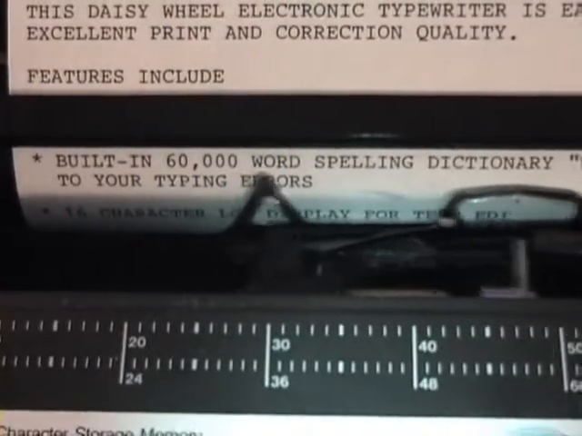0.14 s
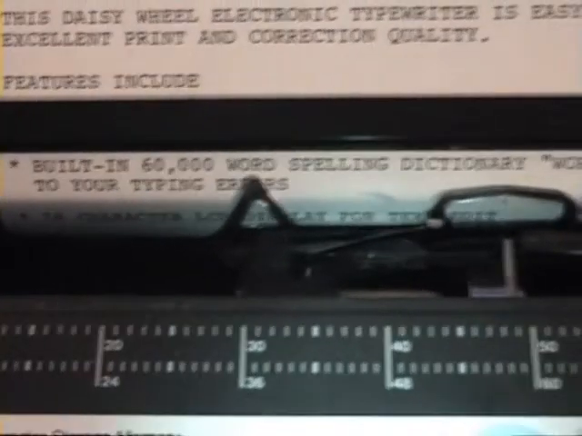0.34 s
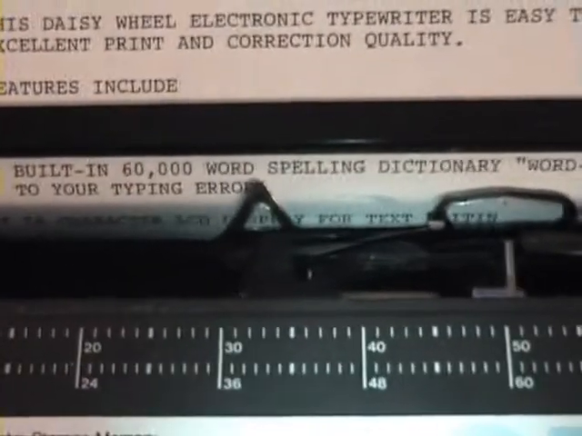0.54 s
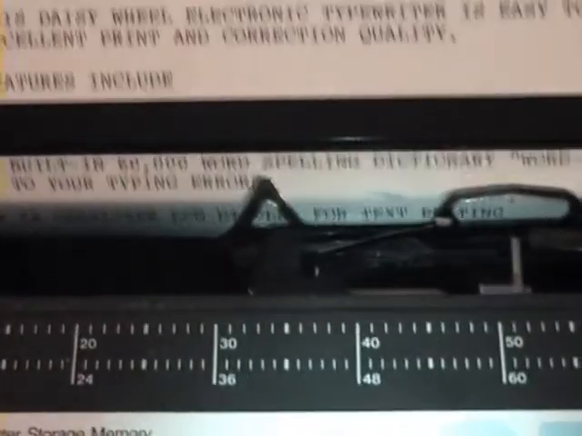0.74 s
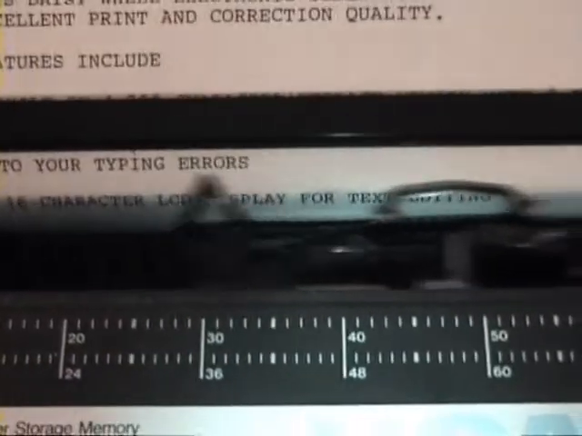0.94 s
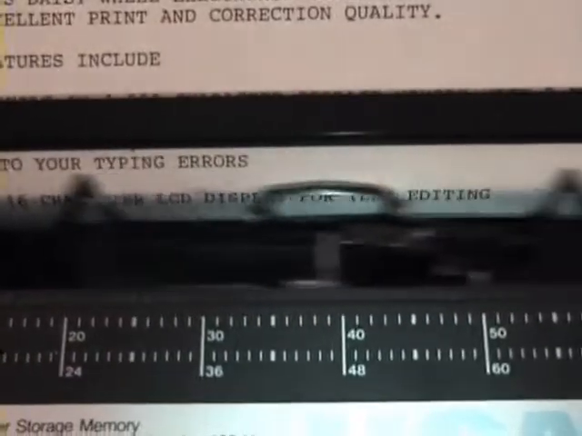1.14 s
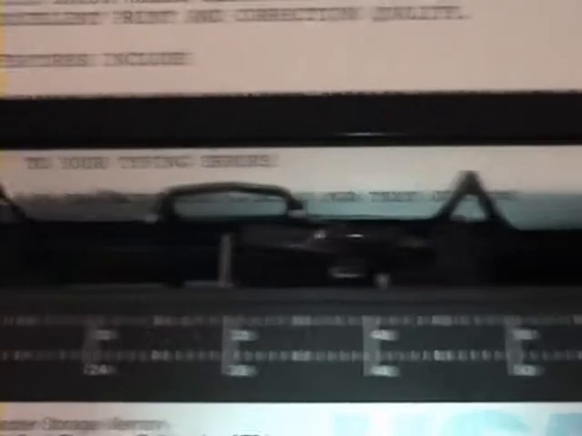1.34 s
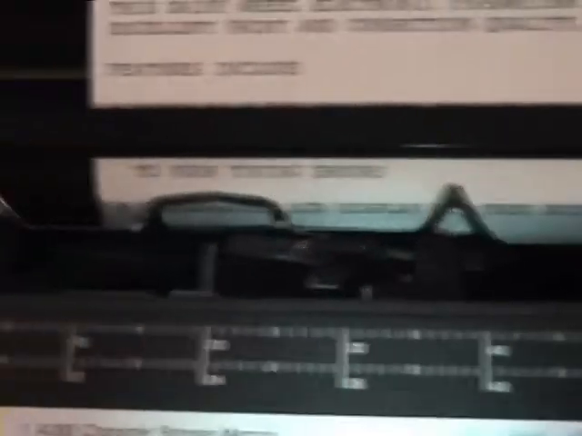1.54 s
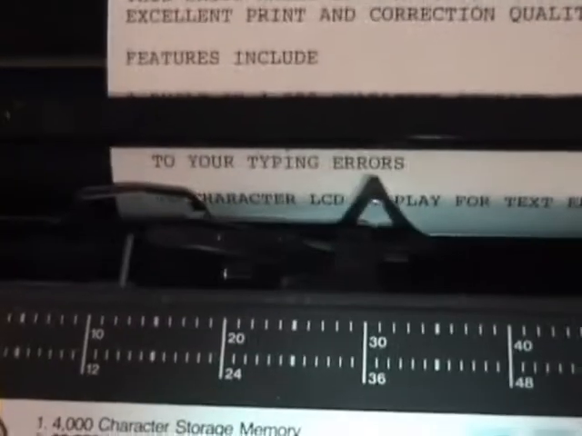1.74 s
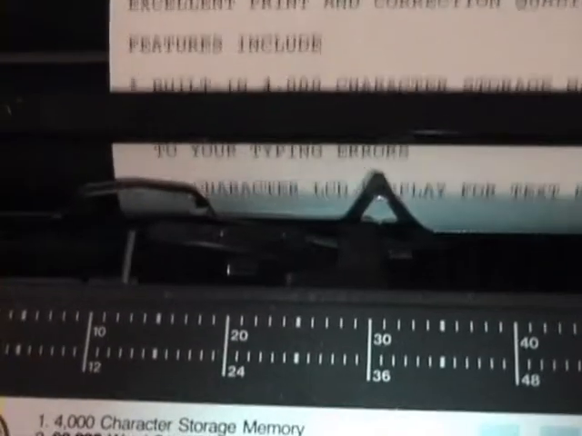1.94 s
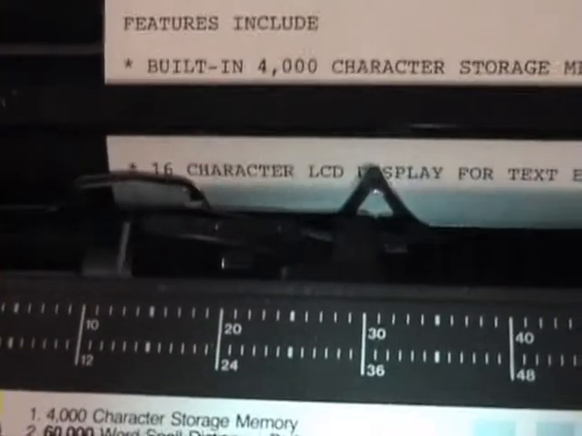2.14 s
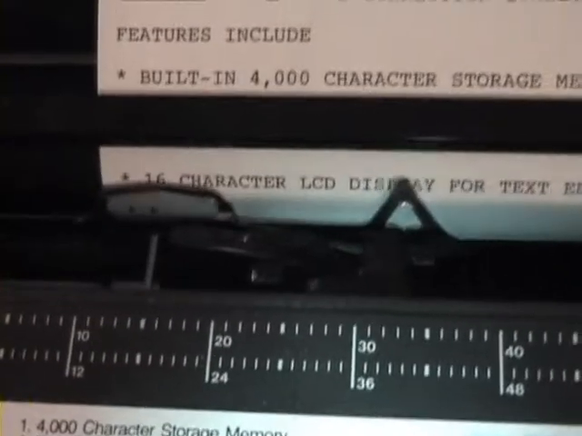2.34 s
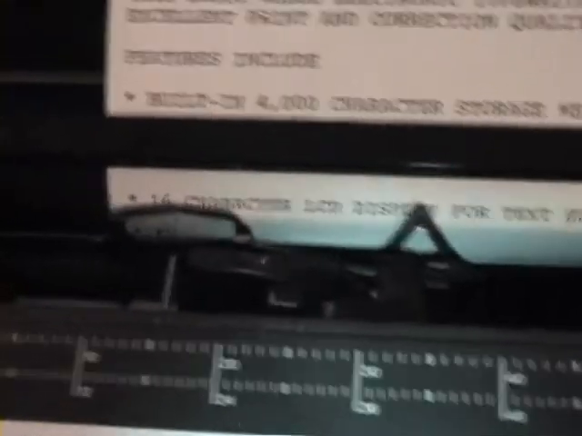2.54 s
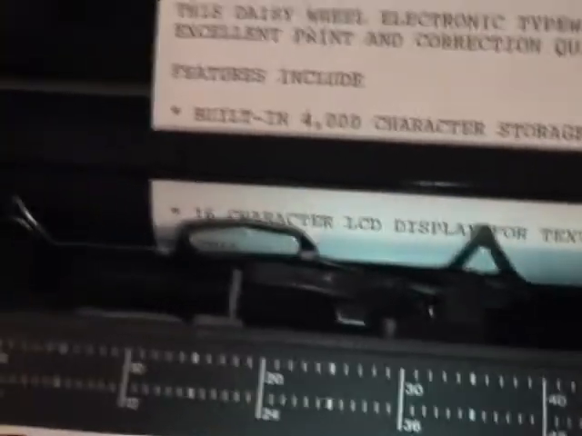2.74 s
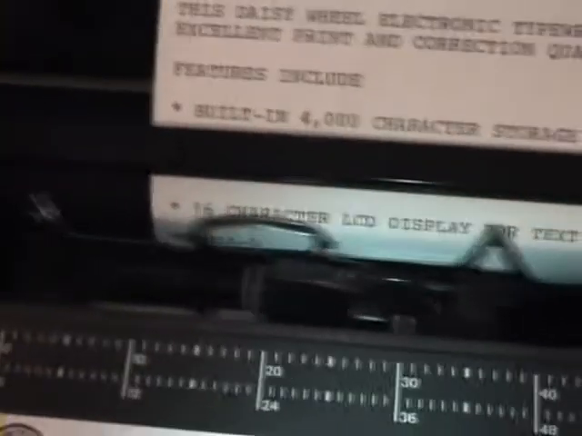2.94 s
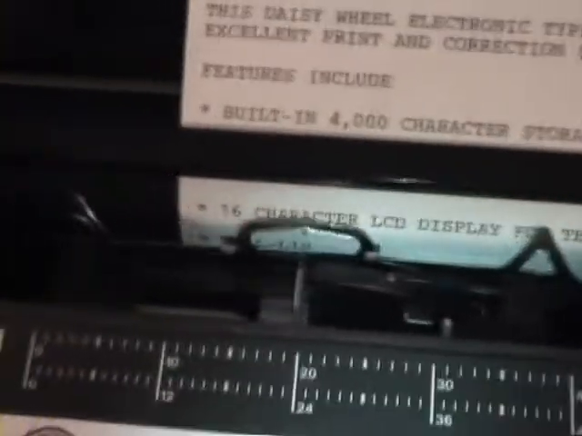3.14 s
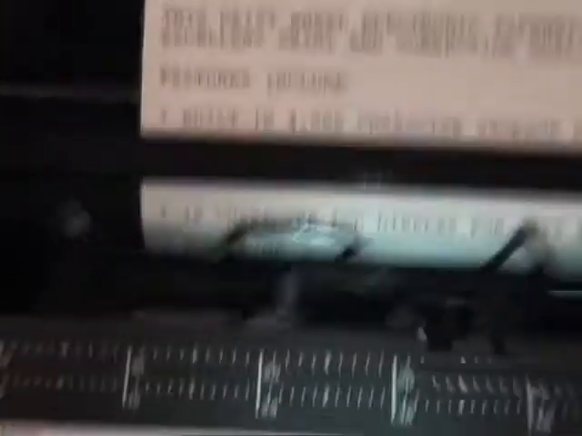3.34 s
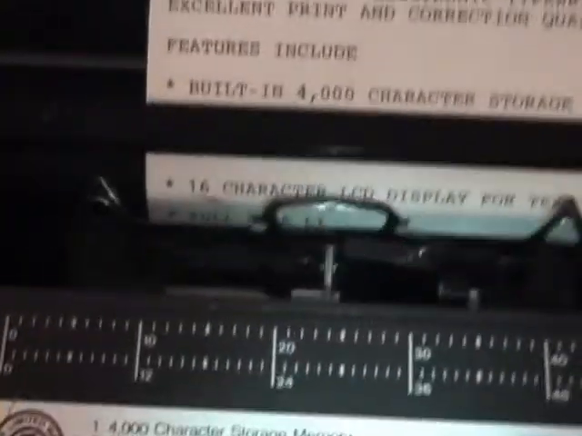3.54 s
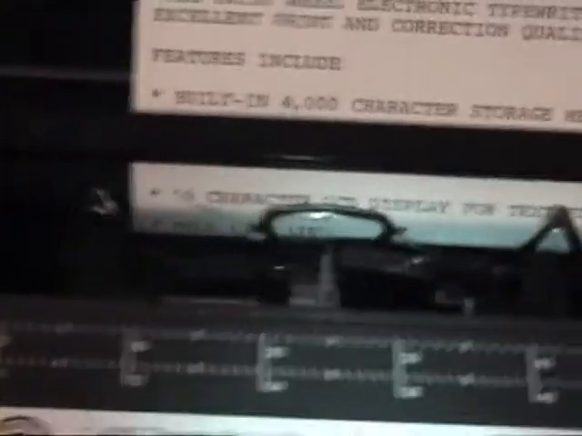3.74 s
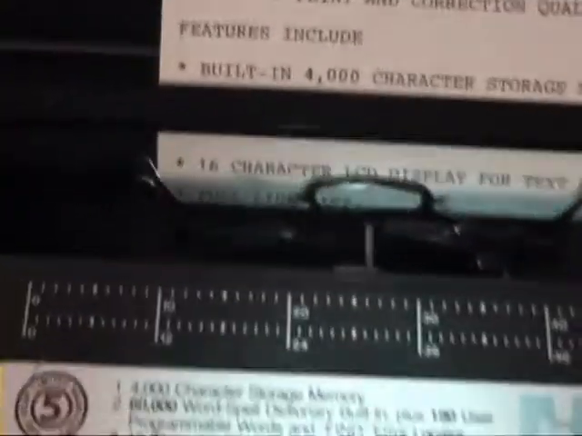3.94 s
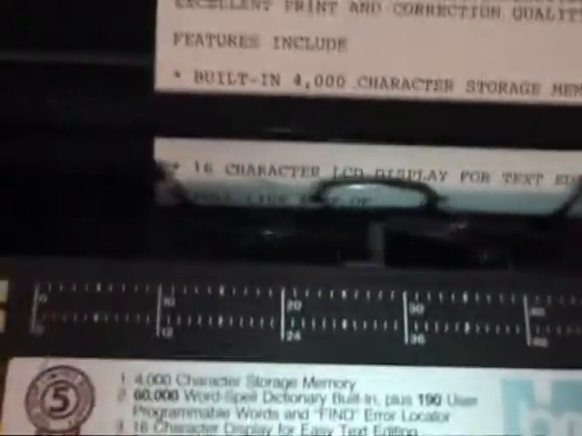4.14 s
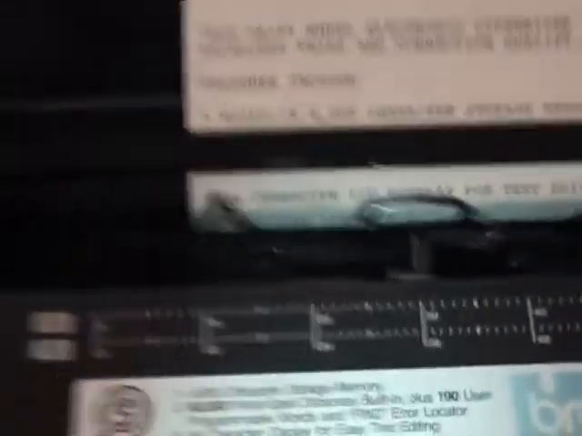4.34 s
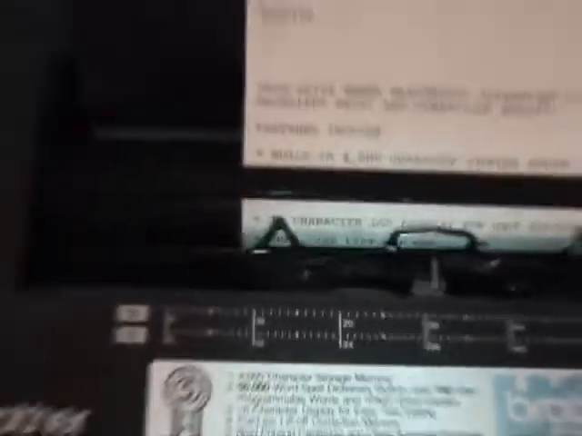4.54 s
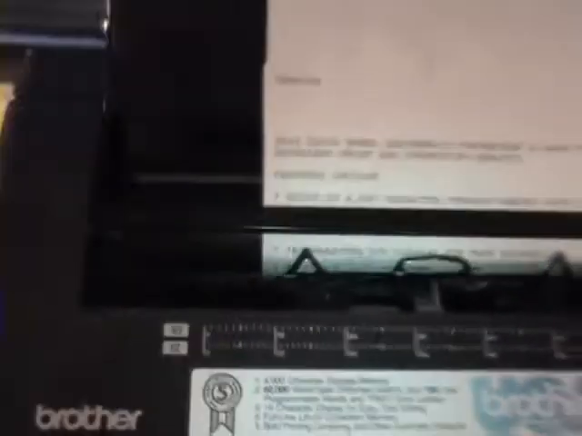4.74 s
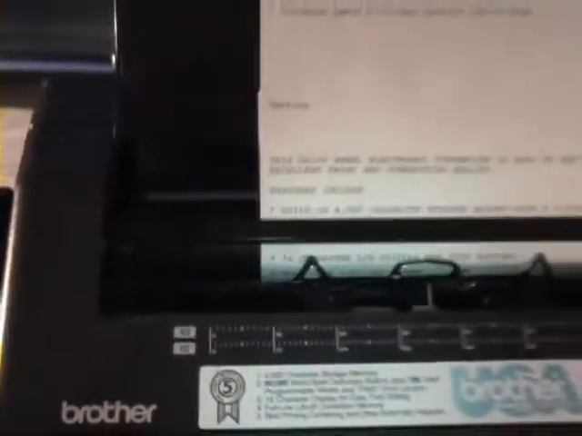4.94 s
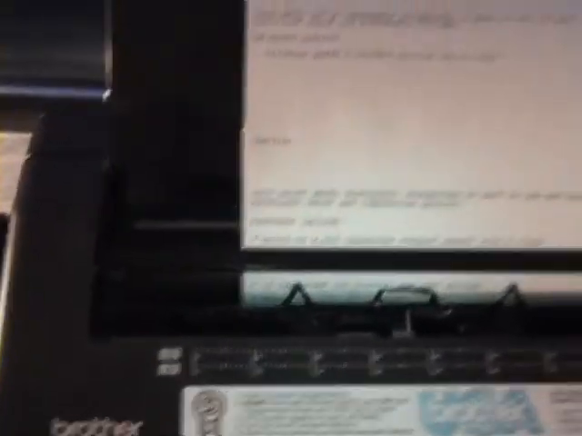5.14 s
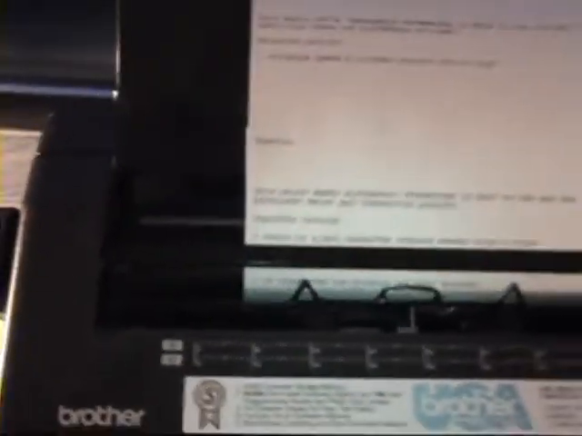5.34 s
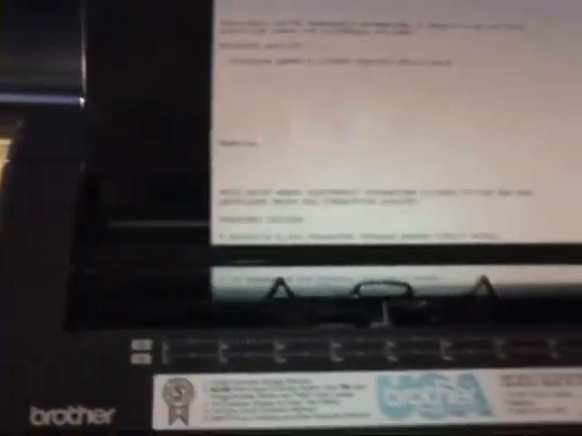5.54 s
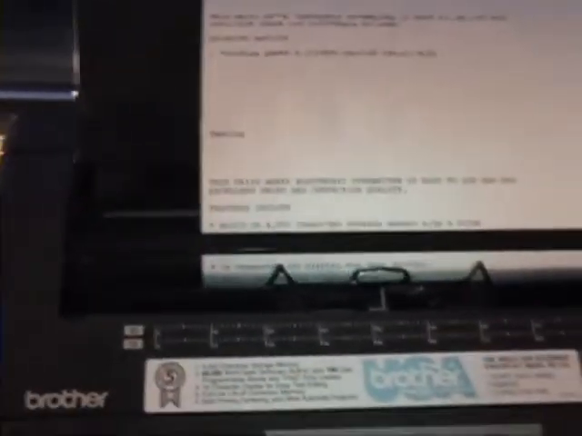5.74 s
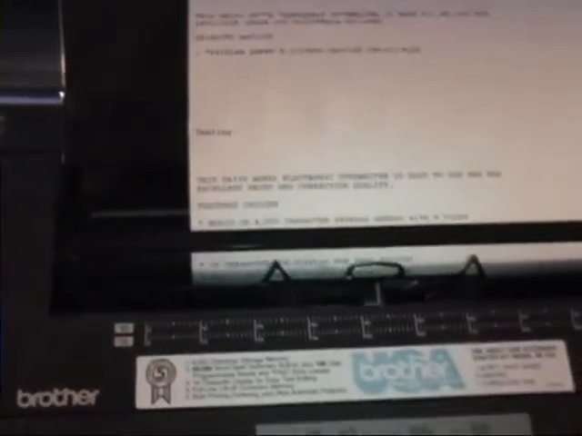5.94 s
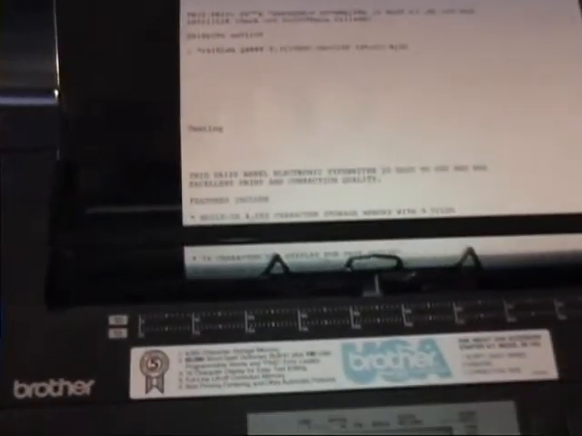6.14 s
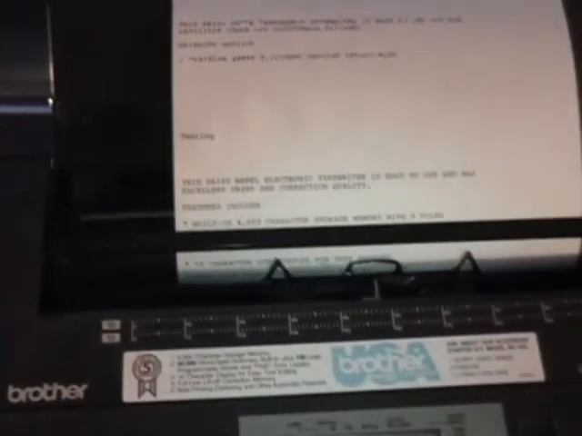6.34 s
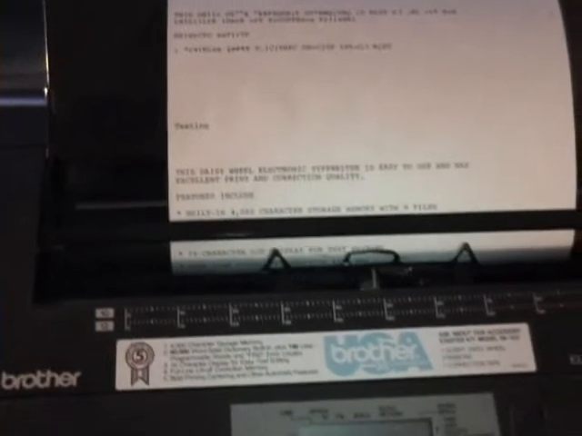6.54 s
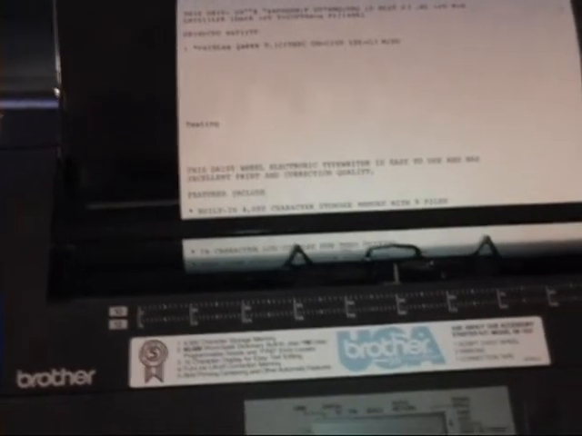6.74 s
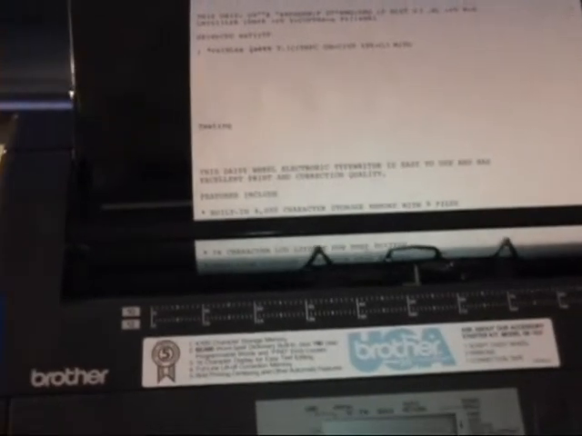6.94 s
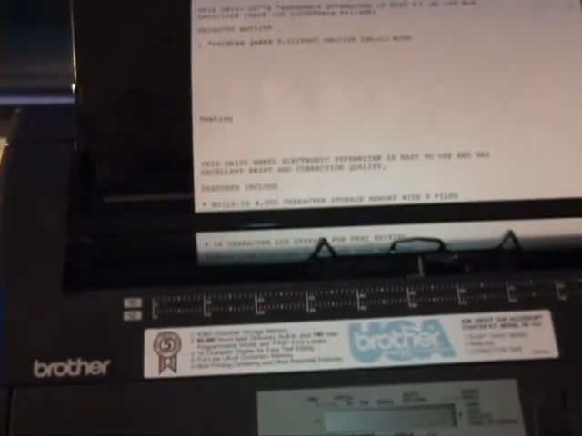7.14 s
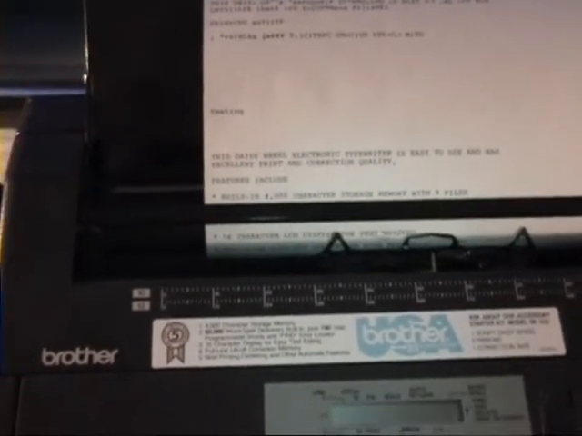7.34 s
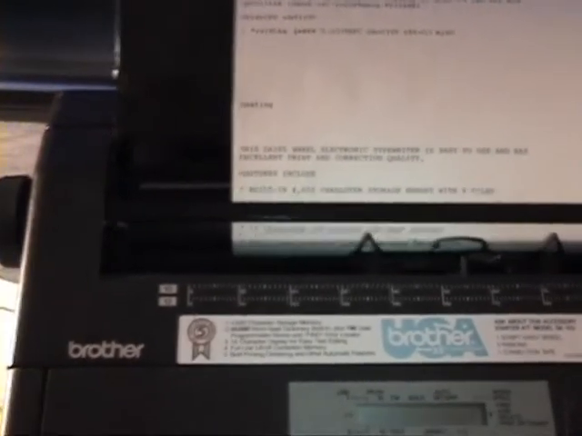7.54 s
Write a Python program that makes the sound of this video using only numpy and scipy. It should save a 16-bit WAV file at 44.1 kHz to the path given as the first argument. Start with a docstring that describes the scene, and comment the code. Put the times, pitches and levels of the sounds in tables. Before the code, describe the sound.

A printing typewriter heard close up in stereo: crisp snaps, ringing roller and hollow case knocks, with wheel chirps and ribbon ticks around each letter. After a short first burst the strikes stop for a swelling carriage hum and a quick ratchet of paper feed. A long second run follows, softer in its middle and stronger again toward the end, with quiet room air and faint hum beneath.

```python
"""A typewriter's hammer strikes letter after letter: snap, ringing platen (the paper roller), frame and case.
Around each blow the daisy wheel whirrs to its letter, the ribbon pawl ticks and the hammer drops back.
After the first few letters the carriage hums back to the margin and the paper feeds with a rattle; then the
next line is typed. Blows are fading tones and noise bursts; motors are wavering tones with coloured noise.
Mains hum and room air lie underneath, and the blows echo in the machine and the room."""
import sys
import numpy as np
from scipy import signal
from scipy.fft import rfft, irfft
from scipy.io import wavfile

SR = 44100
rng = np.random.default_rng(int(sys.argv[2]) if len(sys.argv) > 2 else 0)


def wav_out(sig):
    """Save sig, one row per channel (or a flat mono array), as 16-bit PCM at SR to the path in sys.argv[1]."""
    wavfile.write(sys.argv[1], SR, np.round(np.clip(np.atleast_2d(sig).T, -1, 1) * 32767).astype(np.int16))


N = 333837
BLOW = np.arange(6144) / SR  # time axis of one blow [s]
STRIKE_SAMPLES = 700  # the first 16 ms, which set a blow's level


def amp(db):
    """Turns decibels into a gain."""
    return 10 ** (np.asarray(db) / 20)


def evened(x):
    """Scales a sound to rms 1."""
    return x / np.sqrt(np.mean(x ** 2) + 1e-20)


def punch(x):
    """Scales a blow to rms 1 over its first 16 ms."""
    return x / np.sqrt(np.mean(x[..., :STRIKE_SAMPLES] ** 2) + 1e-20)


def read(points, hz, axis=1):
    """Reads one column of a table along a log-frequency axis."""
    columns = np.transpose(points)
    return np.interp(np.log(hz + 1), np.log(columns[0] + 1), columns[axis])


def follow(curve, s):
    """Reads a control curve at time s."""
    return np.interp(s, *np.transpose(curve))


def gate(t, start, end, ramp):
    """Fades in, holds and fades out."""
    return np.clip(np.minimum(t - start, end - t) / ramp, 0, 1)


def add(mix, s, sound):
    """Mixes a sound in at time s."""
    start = round(s * SR)
    sound = sound[..., max(-start, 0):]
    part = mix[:, max(start, 0):][:, :sound.shape[-1]]
    part += sound[..., :part.shape[1]]


def wander(per_s, size):
    """Joins random values, per_s of them a second, with straight lines."""
    knots = rng.standard_normal(int(size / SR * per_s) + 3)
    return np.interp(np.arange(size) / SR * per_s, np.arange(len(knots)), knots)


# how the two microphones differ; record() plays it too:
# (pitch [Hz], left over right [dB], lead of the left [radians], likeness of noise [0-1])
PAIR = [(40, -5, 0, 0.3), (150, -9, 0.2, .45), (330, -12, -0.72, 1), (550, -15, -0.25, 0.97),
        (900, -11, -0.038, 0.59), (2000, -6, 1, 0.89), (4230, -3.5, 0.99, 0.9), (5260, -1.6, 0.25, 0.86),
        (14000, -.5, -0.1, 0.88)]


def noise(colour, size, tilt_db=0):
    """Coloured noise, partly alike at the two microphones; the tilt is in dB per octave above 400 Hz."""
    hz = np.fft.rfftfreq(size, 1 / SR)
    own, shared = rfft(rng.standard_normal((2, size)))
    same = np.clip(read(PAIR, hz, axis=3), 0, 1)
    left = same * shared + np.sqrt(1 - same ** 2) * own
    level_db = read(colour, hz) + tilt_db * np.log2(np.maximum(hz, 400) / 1000)
    return evened(irfft(np.array([left, shared]) * amp(level_db), size))


def dying(t60):
    """Fades by 60 dB in t60 seconds."""
    return np.exp(-np.log(1000) * BLOW / t60)


def burst(colour, rise, t60, tilt_db=0):
    """Noise that swells and dies, like the many close tones of a small part struck at once."""
    return punch(noise(colour, len(BLOW), tilt_db) * (1 - np.exp(-BLOW / rise)) * dying(t60))


def ring(modes, scatter_db, detune, spread=0.57, direct=False):
    """Struck tones, each off a little in strength, pitch and left side; direct blows start them in step."""
    out = np.zeros((2, len(BLOW)))
    chances = rng.standard_normal((len(modes), 4))
    for k, ((hz, db, t60), (loud, sharp, side, lag)) in enumerate(zip(modes, chances)):
        sign = 1 if direct else (-1) ** k  # otherwise every second tone starts upside down
        level = sign * amp(db + scatter_db * loud)
        swing = level * dying(t60) * np.exp(2j * np.pi * hz * (1 + detune * sharp) * BLOW)
        left = np.exp(spread * (side / 2 + 1j * lag))
        out += (np.array([[left], [1]]) * swing).imag
    return punch(out)


# tint of the room air: (pitch [Hz], relative level [dB per Hz])
FLOOR = [(20, -29), (60, -2), (150, -3.5), (500, -2), (2000, -16), (6000, -26.5), (13000, -39.5),
         (15500, -60)]


def background():
    """Mains hum is one steady 60 Hz tone; room air is soft coloured noise."""
    mains = amp(-55.5) * np.sin(2 * np.pi * 60 * np.arange(N) / SR)
    return mains + amp(-45.5) * noise(FLOOR, N)


# how long the echoes of machine and room last: (pitch [Hz], time to fade 60 dB [s])
ROOM_DECAY = [(100, 0.57), (500, 0.37), (1700, 0.2652), (4500, 0.45), (8000, 0.56), (14000, 0.13)]
# tint of those echoes: (pitch [Hz], relative level [dB])
ROOM_COLOUR = [(100, -1.5), (400, 11.5), (700, -0.5), (1700, 7), (3000, -0.5), (5000, -3.5), (8000, -4),
               (12000, 0), (14000, 3), (15500, -2.5)]


def room(x, wet_db=-8, onset=.012, count=6):
    """Dense echoes from the machine's shell and the room: fading noise whose pattern slowly shifts."""
    size, out = SR // 2, np.zeros((2, N))
    place = np.linspace(0, count - 1, N)
    for k in range(count):
        hz, t, z = signal.stft(noise(ROOM_COLOUR, size), SR, nperseg=256)
        fade = amp(-60 * t / read(ROOM_DECAY, hz)[:, None])
        tail = signal.istft(z * fade, SR, nperseg=256)[1][:, :size]
        tail = tail * (1 - np.exp(-np.arange(size) / SR / onset))
        # each pattern fades into the next
        near = np.flatnonzero(abs(place - k) < 1)
        share = x[:, near] * np.sqrt(1 - abs(place[near] - k))
        add(out, near[0] / SR, signal.fftconvolve(share, tail / np.linalg.norm(tail[1]), axes=1))
    return amp(wet_db) * out


# base loudness of the carriage drive; wheel() plays it too: (time [s], level [dB])
DRIVE_LEVEL = [(0.7, -37.5), (2.35, -31.5), (3.4, -34), (4.23, -32), (5.25, -36), (6.35, -36),
               (6.98, -31.5), (7.5, -33.5)]
# tint of the drive noise: (pitch [Hz], relative level [dB])
DRIVE_COLOUR = [(30, -41), (90, -4), (220, -17), (370, -2.5), (520, -1), (800, -4), (1200, -6.5),
                (1700, -3), (2300, -9.5), (5000, -18.5), (14000, -32.5)]
# motor current while printing, before it wavers: (pitch [Hz], level [dB])
WHINE = [(2134, -57.5), (3201, -47.5), (4268, -49.5), (5335, -54), (6402, -52)]


def printing_drive():
    """The stepper nudges the carriage: uneven noise, a wavering motor whine and shimmering wheel petals."""
    t = np.arange(N) / SR
    printing = np.interp(t, [.85, 1.08, 2.16, 2.22], [1, 0, 0, 1])
    nudges = noise(DRIVE_COLOUR, N) * amp(follow(DRIVE_LEVEL, t) + 3.45 * wander(70, N))
    whine = np.zeros(N)
    for hz, db in WHINE:
        phase = 2 * np.pi * np.cumsum(hz + 18 * wander(40, N)) / SR
        whine += amp(db + 3 * wander(25, N)) * np.sin(phase)
    # the petals of the wheel shimmer while they are shaken
    shimmer = noise([(100, -50), (2700, -35), (3080, -16), (3190, 9), (3300, -24), (4050, -20),
                     (4300, 7), (4600, -2), (5000, -18), (14000, -48)], N)
    shimmer *= amp(2.5 * wander(10, N))
    return printing * (nudges + printing * (whine + amp(-47.0) * shimmer))


def holding_motor():
    """Between the lines the resting wheel motor sings faintly under its holding current."""
    t = np.arange(N) / SR
    resting = np.interp(t, [.85, 1.08, 2.16, 2.22], [0, 1, 1, 0])
    phase = 2 * np.pi * np.cumsum(1762 + 12 * wander(120, N)) / SR
    level = amp(np.interp(t, [1.3, 1.9], [-57, -50]) + 5.7 * wander(30.0, N))
    return resting * level * (np.sin(phase) + 0.31 * np.sin(2 * phase))


def overtones(orders, phase):
    """Sums the multiples of one motor rate, each with a wavering level."""
    total = np.zeros(N)
    for k, level in orders:
        total += amp(level + 1.5 * wander(14, N)) * np.sin(k * phase + rng.uniform(0, 2 * np.pi))
    return evened(total)


# hum of the returning carriage: (multiple of the step rate, relative level [dB])
HUM = [(1, -15), (2, 0), (3, -4), (4, -1), (5, -13), (7, -15), (8, -16)]
# its high whine: (multiple of the step rate, relative level [dB])
SING = [(24, -10), (26, -14), (28, -6), (30, -11), (32, 0), (36, -16)]
# the whine swells past mid-run: (time [s], level [dB])
SING_LEVEL = [(1.1, -60.5), (1.65, -53.5), (1.82, -56)]
# tint of the carriage sliding on its rail: (pitch [Hz], relative level [dB per Hz])
SLIDE = [(40, -20), (110, -4), (240, -17), (400, 0), (580, 8.5), (720, -3.5), (1200, -6), (1700, 0.5),
         (2000, -13), (3000, -24), (4900, -17), (5800, -33), (10000, -36), (14000, -48)]
RETURN_START_S, RETURN_END_S, RETURN_RAMP_S = 1.046, 1.87, .05
RETURN_DB, RETURN_SWELL_DB_PER_S = -45.5, 5.5  # hum at the start, then its growth toward the margin
SLIDE_DB = -3.5  # rail noise relative to the hum
STEP_HZ = 155.8


def carriage_return():
    """The stepper runs the carriage back at a nearly steady step rate, with rail noise around its hum."""
    t = np.arange(N) / SR
    phase = 2 * np.pi * np.cumsum(STEP_HZ * (1 + 0.00054 * wander(30.5, N))) / SR
    hum, sing = overtones(HUM, phase), overtones(SING, phase)
    slide = noise(SLIDE, N) * amp(1.2 * wander(44.6, N))
    swell = amp(RETURN_DB + RETURN_SWELL_DB_PER_S * (t - RETURN_START_S))
    run_back = swell * (hum + amp(SLIDE_DB) * slide) + amp(follow(SING_LEVEL, t)) * sing
    return gate(t, RETURN_START_S, RETURN_END_S, RETURN_RAMP_S) * run_back


# tint of the paper gears: (pitch [Hz], relative level [dB per Hz])
GEARS = [(50, -16), (125, 0.5), (250, -7), (380, 1), (650, -2), (1000, -9), (1400, -3.5), (1800, -2),
         (2200, -12.5), (2750, -7.5), (3500, -18.5), (7000, -21), (12000, -29), (15000, -43)]
# further knocks of the feed: two clunks of the platen's detent, the catch that holds its place, then two
# heavier knocks that land with the last gear steps: (time [s], level [dB])
FEED_KNOCKS = [(1.927, -23), (1.981, -21.5), (2.0, -24), (2.028, -29)]
FEED_START_S, FEED_STEP_S, FEED_STEPS = 1.8485, .0245, 9
FEED_DB, FEED_ENDS_DB = -30, -1  # middle step, and the change toward the first and last


def paper_feed():
    """Gears knock the platen round in even steps, loudest in the middle; its detent clunks in between, and a
    few late steps knock harder."""
    out = np.zeros((2, N))
    steps = [(FEED_START_S + k * FEED_STEP_S, FEED_DB + FEED_ENDS_DB * place ** 2)
             for k, place in enumerate(np.linspace(-1, 1, FEED_STEPS))]
    for s, db in steps + FEED_KNOCKS:
        add(out, s, amp(db) * burst(GEARS, rise=0.00084, t60=0.079))
        click_db = db - 12 + 0.94 * (db + 23.5)  # hard knocks click more
        add(out, s, amp(click_db) * burst(CRACK, rise=.0005, t60=0.016, tilt_db=2.5))
    return out


def turn(start, end, fast_hz, tone_db, slow_hz=1400, overtone_db=-17, mesh_db=-13):
    """One turn of the daisy wheel: its stepper's tone rises and falls while the gears rasp."""
    size = max(int((end - start) * SR), 64)
    arch = np.sin(np.pi * np.linspace(0, 1, size) ** 1.5)  # it brakes faster than it starts
    hz = (slow_hz + (fast_hz - slow_hz) * arch) * (1 + .015 * wander(250, size))
    phase = 2 * np.pi * np.cumsum(hz) / SR
    throb = amp(4 * wander(120, size))
    tone = np.sin(phase) + amp(overtone_db) * np.sin(2 * phase)
    tone = evened((tone + amp(mesh_db) * np.sin(phase + phase / 2)) * throb)
    gears = noise([(600, -3), (1050, -5), (1250, -5), (1500, 7.5), (1850, 10), (2150, -24),
                   (2750, -4), (3600, -32), (7000, -4), (14000, -48)], size)
    teeth = amp(3.5 * wander(398, size))  # the teeth catch unevenly
    return evened(amp(tone_db) * tone + gears * teeth) * signal.windows.tukey(size, .4)


# extra wheel turns: spins after the first letters, a chirp, the long seek before the new line's first letter:
# (start [s], end [s], level [dB], top pitch before it wavers [Hz], tone over gear rasp [dB])
EXTRA_TURNS = [(0.814, 0.903, -35.5, 1800, 4), (0.871, 0.961, -42, 1620, 2), (1.019, 1.038, -34.5, 1770, 7),
               (2.168, 2.256, -28.5, 1855, 2)]
# a turn starts this long before its blow, but no sooner than the wait after the last blow
SEEK_LEAD_S, SEEK_WAIT_S, SEEK_STOP_S = .098, .031, .012
SEEK_HZ, SEEK_SCATTER_HZ, SEEK_TONE_DB = 1790, 70, -3.5  # top pitch, its scatter, tone over gear rasp
SEEK_DB, SEEK_SCATTER_DB = -8.5, 3  # relative to the drive


def wheel():
    """The wheel seeks each petal and stops just before the blow, each turn a little different."""
    out, last = np.zeros((2, N)), -1
    for (s, *_), (loud, fast) in zip(LETTERS, rng.standard_normal((len(LETTERS), 2))):
        start = max(last + SEEK_WAIT_S, s - SEEK_LEAD_S)
        db = follow(DRIVE_LEVEL, s) + SEEK_DB + SEEK_SCATTER_DB * loud
        top_hz = SEEK_HZ + SEEK_SCATTER_HZ * fast
        add(out, start, amp(db) * turn(start, s - SEEK_STOP_S, fast_hz=top_hz, tone_db=SEEK_TONE_DB))
        last = s
    for start, end, db, top_hz, tone_db in EXTRA_TURNS:
        add(out, start, amp(db) * turn(start, end, fast_hz=top_hz, tone_db=tone_db))
    return out


# loudness of the ribbon pawl's pull: (time [s], level [dB])
PAWL_LEVEL = [(0.05, -26), (0.77, -24), (2.35, -20.5), (2.9, -24.5), (3.75, -24), (4.6, -29), (6.8, -27.5),
              (7.5, -23.5)]
# tint of the pawl, a small hooked lever; hammer() plays it too: (pitch [Hz], relative level [dB per Hz])
PAWL = [(300, -14), (1000, 1), (1600, 7), (2500, -5), (4500, 0), (6300, 0.5), (6950, 5.5), (7600, -1.5),
        (9900, -1), (12500, -7), (13700, -5.5), (15500, -29)]
# tint of the hammer falling back: (pitch [Hz], relative level [dB per Hz])
FALL = [(300, -13.5), (1700, -0.5), (3000, -6.5), (4400, -9), (6000, -7), (7200, -2), (9000, -7.5),
        (11000, 0.5), (11600, -1.5), (12100, -6.5), (13300, -9.5), (15500, -35)]
# loose ticks of ribbon and carriage: (time [s], level [dB], treble tilt [dB per octave])
TICKS = [(0.849, -45, -8), (0.992, -35, -7.5), (1.0285, -35.5, -8), (2.112, -40, -5), (3.4756, -22, -5),
         (3.4797, -22.5, 1.5)]
# pull and latch come before the blow, fall-back and settling after it
PULL_LEAD_S, LATCH_LEAD_S, FALL_LAG_S, SETTLE_LAG_S = .0317, .0168, .0177, .0255
LATCH_DB, SETTLE_DB = -4.5, -12  # relative to the pull and to the fall-back
FALL_DB, FALL_SHARE = -22.5, 0.41  # fall-back after a blow of force 0 dB, and how far it follows the force


def ribbon():
    """The pawl pulls and latches the ribbon before each letter; then the hammer falls back on its stop."""
    out = np.zeros((2, N))
    pawl = burst(PAWL, rise=0.00047, t60=0.029)
    chances = rng.standard_normal((len(LETTERS), 3))
    for (s, force_db, _), (early, late, loose) in zip(LETTERS, chances):
        pawl_db, fall_db = follow(PAWL_LEVEL, s), FALL_DB + FALL_SHARE * force_db
        pull = punch(0.27 * pawl + burst(PAWL, rise=0.00072, t60=0.035))
        latch = burst(PAWL, rise=0.0004, t60=0.1, tilt_db=-1.5)
        fall = burst(FALL, rise=0.00055, t60=0.043)
        settle = burst(FALL, rise=0.00082, t60=0.062)
        add(out, s - PULL_LEAD_S + .0004 * early, amp(pawl_db) * pull)
        add(out, s - LATCH_LEAD_S + .0005 * early, amp(pawl_db + LATCH_DB + 1.2 * loose) * latch)
        add(out, s + FALL_LAG_S + .0003 * late, amp(fall_db) * fall)
        add(out, s + SETTLE_LAG_S + .001 * late, amp(fall_db + SETTLE_DB) * settle)
    # a small spring pings as the wheel comes to rest
    spring = [(4050, 0, 0.023), (4220, -3, 0.023), (5100, -6, .015)]
    add(out, .958, amp(-42) * ring(spring, scatter_db=1, detune=.005))
    for s, db, tilt_db in TICKS:
        add(out, s, amp(db) * burst(FALL, rise=0.00033, t60=0.083, tilt_db=tilt_db))
    return out


def along_rail(spots, s):
    """Blends the sounds of neighbouring spots on the platen as time goes on."""
    place = s * SR / N * (len(spots) - 1)
    return punch(sum(max(1 - abs(place - k), 0) * spot for k, spot in enumerate(spots)))


# tones of the case before scatter: (pitch [Hz], relative level [dB], time to fade 60 dB [s])
CASE = [(92.5, -33, 0.45), (272.4, -14, 0.085), (373.2, -8, 0.12), (501.3, -4.5, 0.079), (619, -2, 0.099),
        (678, -0.5, 0.092), (764, -6, 0.064), (887, -1.5, 0.042), (952, -3.5, 0.071)]
# tones above CASE_UPPER_HZ grow steadily, passing their table levels at CASE_EVEN_S
CASE_UPPER_HZ, CASE_UPPER_DB_PER_S, CASE_EVEN_S = 720, 1.6, 4.8


def case_modes(s):
    """The case's tones at time s: the upper ones slowly come forward."""
    growth_db = CASE_UPPER_DB_PER_S * (s - CASE_EVEN_S)
    return [(hz, db + (hz > CASE_UPPER_HZ) * growth_db, t60) for hz, db, t60 in CASE]


# one row a letter; wheel() and ribbon() play it too: (time [s], force of the blow [dB], platen ring [dB])
LETTERS = [(0.0528, -2.5, -20), (0.2215, 0, -18.5), (0.357, -0.5, -20), (0.4907, 0.5, -20.5),
           (0.587, 0, -19), (0.7655, -1, -18), (2.268, 1.5, -28), (2.4057, 2.5, -20.5), (2.5603, 1.5, -22),
           (2.6887, 0.5, -26.5), (2.7822, 0.5, -26), (2.9064, 3.0, -40), (3.0315, 0.5, -23.5),
           (3.163, 1, -25.5), (3.2584, -1.5, -23.0), (3.4162, -0.5, -22), (3.591, 1, -23.5),
           (3.7495, 1.5, -22), (3.8686, 0, -19), (3.992, 1.0, -40), (4.1071, 1.5, -18),
           (4.2276, 1.0, -20.5), (4.3187, 1, -19), (4.4377, 0.5, -21), (4.5486, -2.5, -16.5),
           (4.656, -2.0, -16.5), (4.7472, -1.5, -19.5), (4.8824, -3.5, -18.5), (4.9833, -3.5, -20),
           (5.1083, -4.0, -19.0), (5.243, -2, -19.5), (5.4243, -3, -17.0), (5.6102, -7.0, -18.5),
           (5.7299, -7, -18.5), (5.8327, -4, -20), (5.9664, -5.5, -20), (6.0903, -5, -17),
           (6.2817, -3, -18.5), (6.416, -1.5, -16), (6.5362, -1.5, -19), (6.681, 1.0, -16.5),
           (6.7949, 1.5, -17.0), (6.9172, 3, -17), (7.0124, 2, -15), (7.1457, 3, -18.0), (7.328, 3.0, -16),
           (7.513, 2.5, -17.0)]
# the platen's pitch shifts with the spot that is struck: (time [s], pitch [Hz])
PLATEN_PITCH = [(0.3, 4570), (0.77, 4790), (2.27, 4500), (3.8, 4580), (5.2, 4600), (5.5, 4750), (6.4, 4770),
                (7.3, 4580)]
# tones of the platen before scatter: (multiple of its pitch, relative level [dB], time to fade 60 dB [s])
PLATEN = [(.82, -19.5, 0.063), (0.938, -4, 0.039), (1.002, 5, 0.027), (1.043, -5, 0.024), (1.1, -4.5, 0.02),
          (1.18, -3, 0.013)]
# first swings of the hammer tip, before detuning: (pitch [Hz], relative level [dB], time to fade 60 dB [s])
SNAP = [(3260, 2, 0.0022), (4660, -6.5, 0.0056), (6720, 2.5, 0.0042)]
# tones of the carriage frame before scatter: (pitch [Hz], relative level [dB], time to fade 60 dB [s])
FRAME = [(1142, -5, 0.067), (1285, -6, 0.037), (1462, -1, 0.081), (1514, -5.5, 0.04), (1700, -1.5, 0.057),
         (1794, -4.5, 0.07), (2077, -2, 0.054), (2280, -1.5, 0.065), (2365, 2, 0.043), (2550, 0, 0.045),
         (2680, -3, 0.051), (3030, -8, 0.096), (3430, -6, 0.028)]
# tint of the contact; paper_feed() plays it too: (pitch [Hz], relative level [dB per Hz])
CRACK = [(200, -30), (700, 2), (1500, 2), (3000, -1.5), (4500, 2), (6800, -2), (8500, -5.5), (11000, -7.5),
         (13500, -14), (16000, -63)]
CLACK_DB, THUMP_DB, THUMP_SHARE = -20.5, -23, 0.37  # for force 0 dB, and how far the thump follows it
# a letter that rings the platen less than this lands flat and thumps the case more
DULL_BELOW_DB, DULL_SHARE = -22, 0.18


def hammer():
    """The hammer drives a petal into the platen: a snap, the platen's ring, then frame and case."""
    out = np.zeros((2, N))
    cracks = [burst(CRACK, rise=.00006, t60=0.0049) for _ in range(12)]  # the contact itself
    # small parts that the blow shakes
    clatters = [burst(CRACK, rise=0.00074, t60=0.049, tilt_db=-0.5) for _ in range(12)]
    # the frame answers differently at each spot
    frames = [ring(FRAME, scatter_db=5, detune=0.013) for _ in range(12)]
    rumble_cut = signal.butter(2, 150, "highpass", fs=SR, output="sos")
    for s, force_db, ring_db in LETTERS:
        clack_db, ring_hz = CLACK_DB + force_db, follow(PLATEN_PITCH, s)
        dull_db = DULL_SHARE * max(DULL_BELOW_DB - ring_db, 0)
        thump_db = THUMP_DB + THUMP_SHARE * force_db + dull_db
        touch = burst(PAWL, rise=0.00033, t60=0.0098)
        crack = along_rail(cracks, s) + 0.92 * burst(CRACK, rise=.00006, t60=0.0073)
        # the solenoid fires at the same strength each time
        snap = ring(SNAP, scatter_db=0, detune=0.1, spread=0.071, direct=True)
        platen_modes = [(ring_hz * ratio, db, t60) for ratio, db, t60 in PLATEN]
        platen = ring(platen_modes, scatter_db=5.5, detune=0.0093, spread=.25, direct=True)
        case = ring(case_modes(s), scatter_db=2.5, detune=0.0073, spread=0.27)
        case = signal.sosfilt(rumble_cut, case)
        add(out, s - .0014, amp(clack_db - 11.0) * touch)  # it meets the petal first
        add(out, s, amp(-25.3) * snap)
        add(out, s, amp(clack_db - 3.5) * crack + amp(clack_db - 2.0) * along_rail(clatters, s))
        add(out, s, amp(ring_db) * platen)
        add(out, s + 0.00021, amp(clack_db - 2.5) * along_rail(frames, s))
        add(out, s + 0.0004, amp(thump_db) * case)
        add(out, s + .0079, amp(-35.5) * (snap + crack / 2))  # the hammer bounces once
    return out


def scene():
    """The machine at work: blows with their echoes, motors, mains hum and room air."""
    motors = printing_drive() + holding_motor() + carriage_return()
    blows = paper_feed() + wheel() + ribbon() + hammer()
    return background() + room(blows, wet_db=-11.5, onset=0.0048) + motors + blows


EDGE_HZ = 15600  # top of the band


def record(dry):
    """The left microphone is thin in the bass, its timing shifts with pitch; peaks overload softly; band limit."""
    hz = np.fft.rfftfreq(N, 1 / SR)
    left = amp(read(PAIR, hz, axis=1)) * np.exp(1j * read(PAIR, hz, axis=2))
    sides = np.array([left, np.ones_like(left)]) * 2 / abs(1 + left)  # keeps the level of left plus right
    pair = irfft(rfft(dry) * sides, N)
    ceiling = amp(-.5)
    held = pair / (1 + (pair / ceiling) ** 8) ** (1 / 8)
    low_pass = signal.firwin(81, EDGE_HZ - 500, window=("kaiser", 8), fs=SR)
    return signal.oaconvolve(held, low_pass[None], "same")


dry = scene()
out = record(dry)
wav_out(out)
```